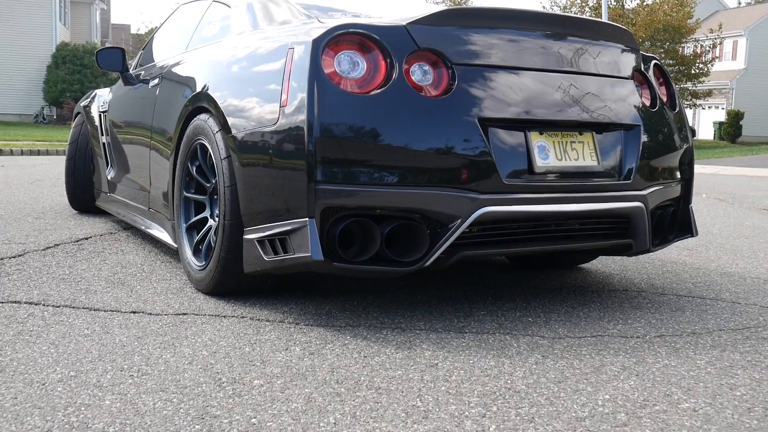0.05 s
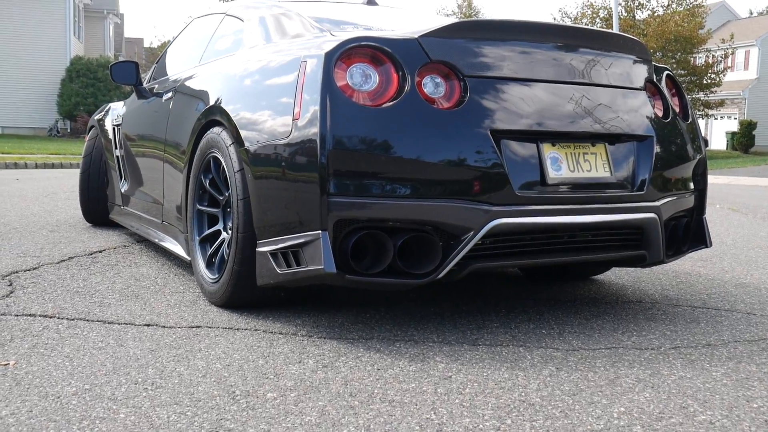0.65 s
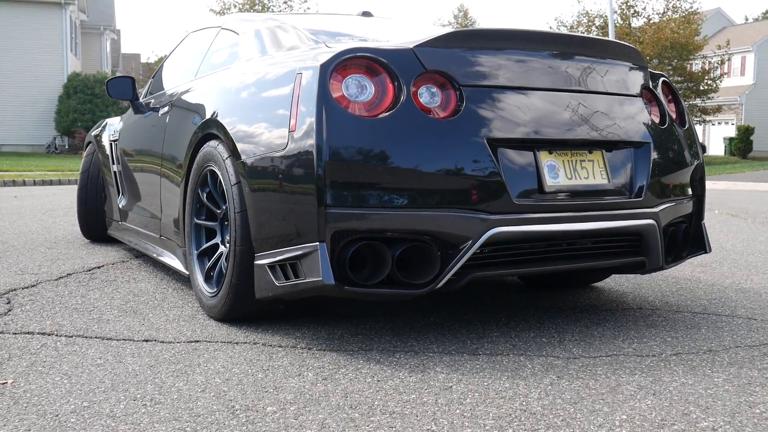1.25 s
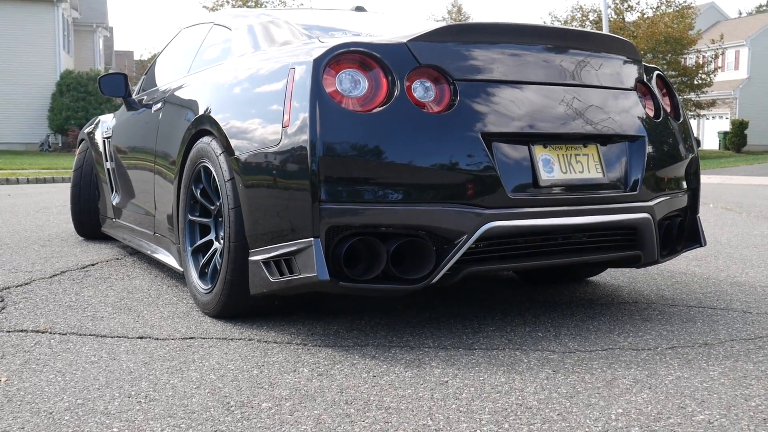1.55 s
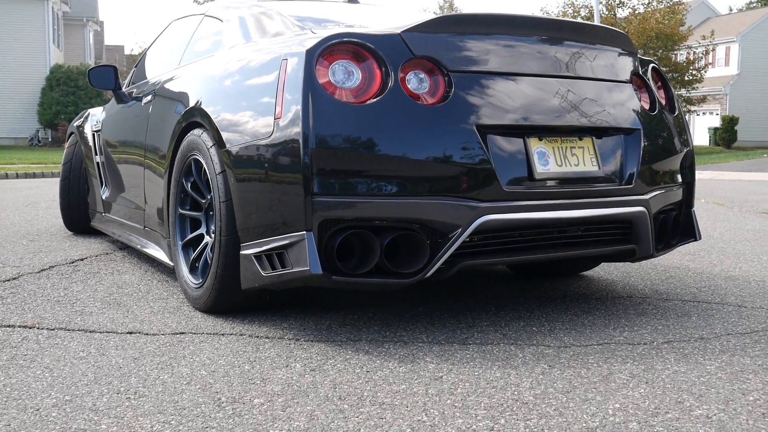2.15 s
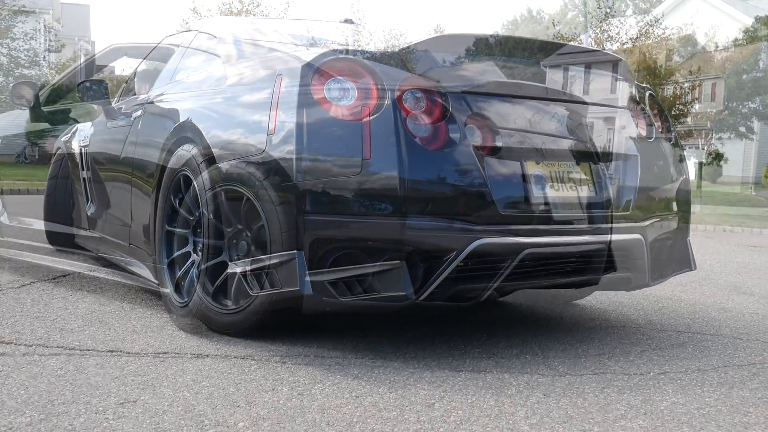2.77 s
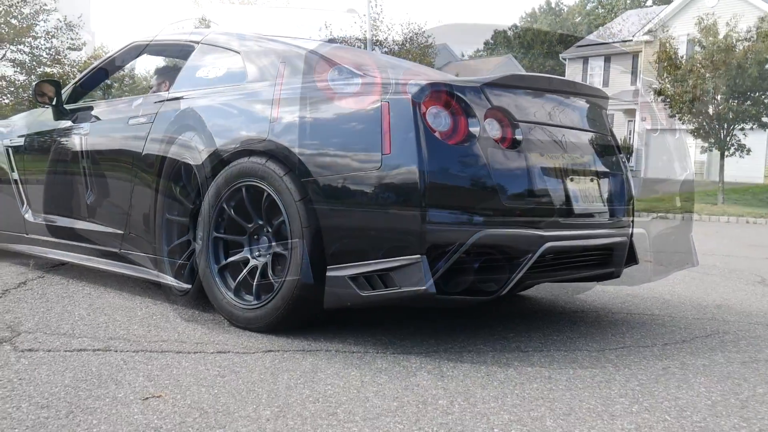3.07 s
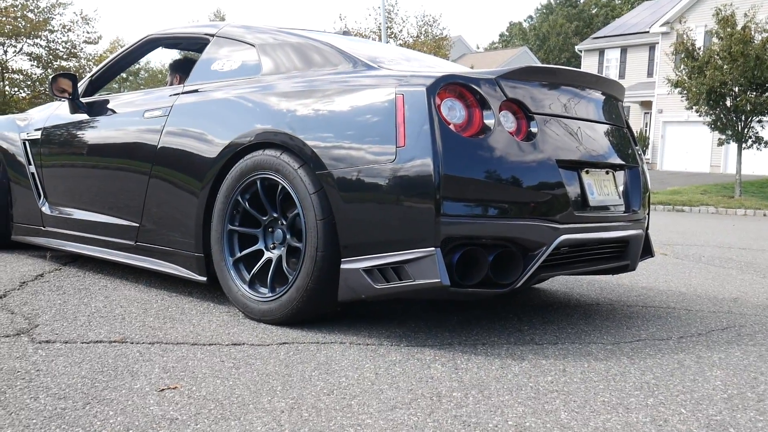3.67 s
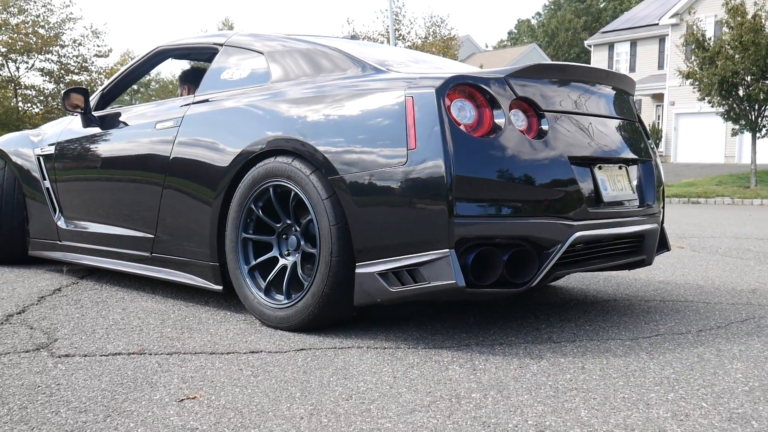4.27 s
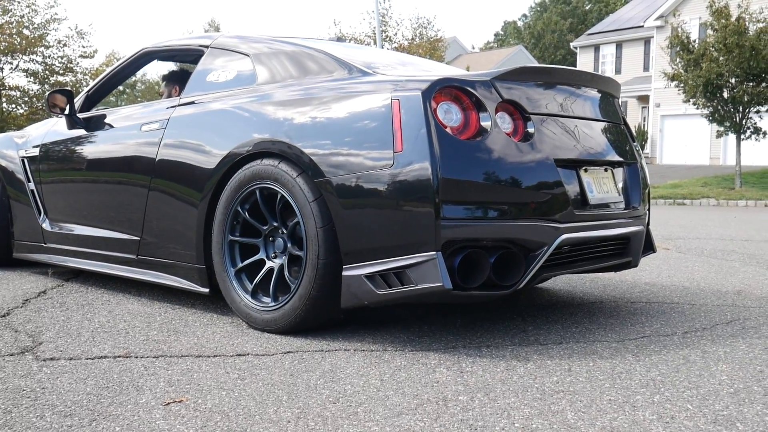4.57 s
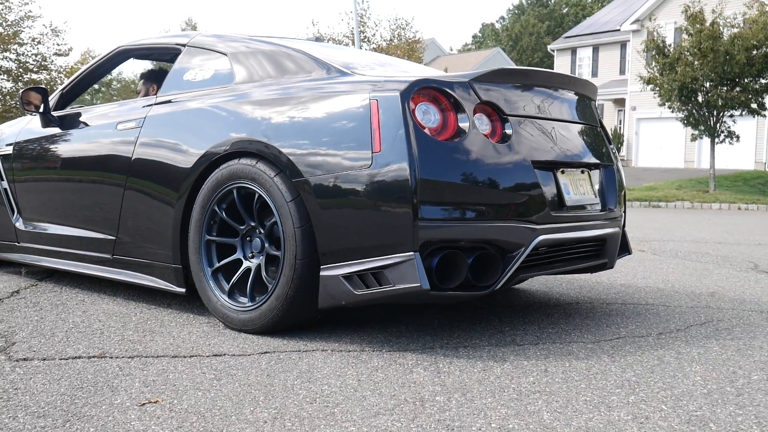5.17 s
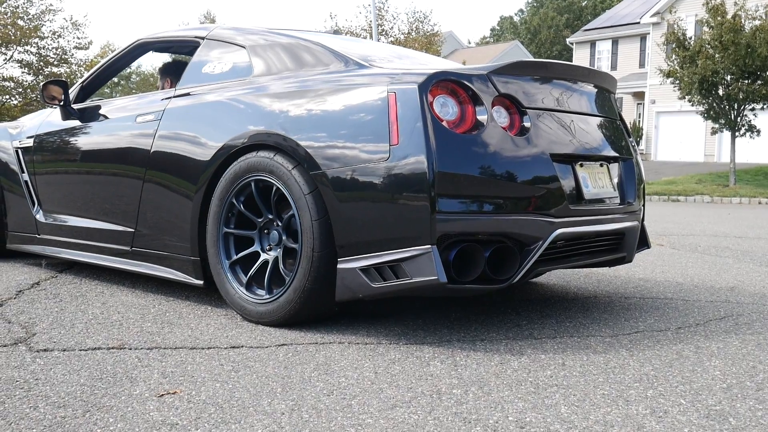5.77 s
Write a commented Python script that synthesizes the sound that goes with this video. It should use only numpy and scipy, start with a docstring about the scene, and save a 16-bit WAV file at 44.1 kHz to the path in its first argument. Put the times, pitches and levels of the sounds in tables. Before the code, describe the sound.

Deep, throbbing car idle close to the tailpipes, settling lower before one raised, held rev that slowly sags, with faint bird chirps.

```python
"""A tuned twin-turbo V6 parked in a quiet street, heard a few metres behind its tailpipes.
The fast cold idle dissolves into a lumpier warm idle; the engine stumbles, is blipped, held, then sags.
Six unequal firings ring the exhaust, gas spurts from the pipes and a belt-driven part whines with the revs.
Nearby are a few gritty scuffs and a small chipping bird; the houses return weak echoes."""
import sys
import numpy as np
from scipy import signal
from scipy.fft import rfft, irfft
from scipy.io import wavfile
from scipy.ndimage import uniform_filter1d

SR = 44100
rng = np.random.default_rng(int(sys.argv[2]) if len(sys.argv) > 2 else 0)


def to_wav(sig):
    """Store sig (one row per channel, or 1-D mono) as 16-bit WAV at the path in sys.argv[1].

    Samples outside -1..1 are clipped; the rate is SR.
    """
    pcm = np.clip(np.atleast_2d(sig), -1, 1) * 32767
    pcm = np.round(pcm).astype(np.int16)
    wavfile.write(sys.argv[1], SR, pcm.T)  # frames by channels


N = 256662
T = np.arange(N) / SR
CYLINDERS = 6
# start_s, end_s
SETTLE_S, DISSOLVE_S, CLIMB_S, SAG_S = (0.73, 2.15), (2.25, 3.35), (3.98, 4.51), (5.26, 5.48)
# start_s, attack_s, hold_s, release_s
THROTTLE_S, BLIP_S, RAGGED_S = (3.95, .08, .22, .25), (4.01, .02, .098, .09), (4.32, .049, .11, .13)


def undb(db):
    """Decibels to gain."""
    return 10 ** (np.asarray(db) / 20)


def curve(points, at=T):
    """Straight lines through (x, y) points."""
    return np.interp(at, *np.transpose(points))


def ramp(start_s, end_s):
    """Linear rise from 0 to 1."""
    return np.clip((T - start_s) / max(end_s - start_s, 1 / SR), 0, 1)


def episode(start_s, attack_s, hold_s, release_s):
    """Trapezoid envelope."""
    end_s = start_s + attack_s + hold_s
    return ramp(start_s, start_s + attack_s) - ramp(end_s, end_s + release_s)


def burst(start_s, rise_s, decay_s):
    """Linear rise, exponential decay."""
    age_s = np.maximum(T - start_s, 0)
    return np.minimum(age_s / rise_s, 1) * np.exp(-np.maximum(age_s - rise_s, 0) / decay_s)


def blend(a, b, start_s, end_s):
    """Equal-power crossfade from a to b."""
    turn = ramp(start_s, end_s) * np.pi / 2
    return a * np.cos(turn) + b * np.sin(turn)


def colour(x, response, size=16384):
    """Minimum-phase filter through (freq_hz, gain_db) points."""
    hz, db = np.transpose(response)
    grid_hz = np.maximum(np.arange(size // 2 + 1) * SR / size, 1)
    gain = undb(np.interp(np.log(grid_hz), np.log(hz), db))
    cepstrum = irfft(np.log(gain))
    cepstrum[1:size // 2] *= 2
    cepstrum[size // 2 + 1:] = 0
    return signal.fftconvolve(x, irfft(np.exp(rfft(cepstrum))))[:N]


def band(x, lo_hz, hi_hz):
    """Zero-phase band-pass."""
    return signal.sosfiltfilt(signal.butter(4, [lo_hz, hi_hz], "band", fs=SR, output="sos"), x)


def steady(x, size=4400):
    """Hold at unit RMS, keeping the detail within an engine cycle."""
    power = uniform_filter1d(uniform_filter1d(x * x, size), size)
    return x / np.sqrt(np.abs(power) + 1e-14)


def noise(response):
    """Coloured noise, unit RMS."""
    x = colour(rng.standard_normal(N), response)
    return x / x.std()


def walk(rate_hz):
    """Random wander, spread near 1."""
    knots = rng.standard_normal(1024)
    return np.interp(T * rate_hz, np.arange(len(knots)), knots)


def warm_state(idle, held, sagged):
    """A warm-engine quantity through idle, held revs and sag."""
    return idle + (held - idle) * ramp(*CLIMB_S) + (sagged - held) * ramp(*SAG_S)


def layer_db(levels, stumble_s=4.005, catch_s=0.034):
    """Level of an engine layer over time; it dips in a near-stall just before the blip."""
    cold_db, settled_db, idle_db, held_db, sag_db, blip_db, ragged_db, stumble_db, fade_s = levels
    stall = ramp(stumble_s - fade_s, stumble_s) - ramp(stumble_s, stumble_s + catch_s)
    cold_db = cold_db + (settled_db - cold_db) * ramp(*SETTLE_S)
    warm_db = warm_state(idle_db, held_db, sag_db)
    warm_db += blip_db * episode(*BLIP_S) + ragged_db * episode(*RAGGED_S) + stumble_db * stall
    warmth = ramp(*DISSOLVE_S)
    return 20 * np.log10(np.hypot((1 - warmth) * undb(cold_db), warmth * undb(warm_db)))


def firing_phase(rate):
    """Running count of firings."""
    return np.cumsum(curve(rate) * (T >= rate[0][0])) / SR


# puffs in firing order: strength_db, late_ms, half_width_ms
COLD_PUFFS = [(-2.8, -.33, .31), (2, -.74, .17), (-2.5, -.99, .19), (2.5, -.51, .28), (-1.1, -.5, .29),
              (1.8, -.4, .27)]
IDLE_PUFFS = [(.4, -.56, .36), (1.5, .24, .32), (.9, 0, .26), (-.7, .21, .31), (-.5, -.47, .33),
              (-1.6, .2, .33)]
HELD_PUFFS = [(4.5, -.33, .25), (-2.5, .4, .24), (3, .12, .22), (-7, .27, .28), (.5, .07, .3), (2, .1, .24)]
SAG_PUFFS = [(2.5, -.37, .21), (-.5, .5, .29), (.8, .3, .27), (-4.5, .43, .28), (-.2, .21, .25),
             (2, .15, .2)]
# cold imbalance: time_s, share
COLD_IMBALANCE = [(.45, .55), (.62, 1), (1.3, 1), (1.75, .7), (2, .3)]


def cylinder_balance():
    """Each cylinder's puff over time, cold and warm; they pull evenly as the throttle opens."""
    def uneven(puffs, share):
        return puffs.mean(0) + (puffs - puffs.mean(0)) * share

    cold = np.array(COLD_PUFFS)[..., None]
    warm = warm_state(*np.array([IDLE_PUFFS, HELD_PUFFS, SAG_PUFFS])[..., None])
    return uneven(cold, curve(COLD_IMBALANCE)), uneven(warm, 1 - episode(*THROTTLE_S))


# hard and failed firings: time_s, change_db
ODD_FIRINGS = [(2.337, 2), (4.123, 3), (4.134, 2.5), (4.164, -2), (4.183, 3), (4.193, 2.5), (4.212, -6),
               (4.23, 2), (4.257, -4), (4.302, -5), (4.311, -4), (4.336, 1.5)]


def firings(rate, cylinders, rough_db, steepen, jitter_ms_per_db, ripple_db, size=900):
    """One pressure puff per firing; harder ones are steeper, rough ones stray in time."""
    phase = firing_phase(rate)
    count = np.arange(1, int(phase[-1]) + 1)
    fire_s = np.interp(count, phase, T)
    chance = rng.standard_normal((len(count), 2))
    now = (fire_s * SR).astype(int)
    usual_db, late_ms, width_ms = cylinders[count % CYLINDERS, :, now].T
    change_db = rough_db[now] * chance[:, 0]
    for time_s, odd_db in ODD_FIRINGS:
        nearest = np.argmin(abs(fire_s - time_s))
        fire_s[nearest], change_db[nearest] = time_s, odd_db
    strength = undb(usual_db + change_db)
    fire_s += (late_ms + jitter_ms_per_db * rough_db[now] * chance[:, 1]) / 1000
    width_s = width_ms / 1000 / undb(change_db) ** steepen
    at = (fire_s * SR).astype(int)[:, None] + np.arange(-size, size)
    age_s = at / SR - fire_s[:, None]
    puffs = (strength * width_s)[:, None] / (width_s[:, None] ** 2 + age_s ** 2) * np.hanning(2 * size)
    inside = (at >= 0) & (at < N)
    train = np.bincount(at[inside], puffs[inside], N) * np.mean(width_s)
    # manifold waves repeat each engine cycle
    cycle = signal.resample(np.diff(rng.standard_normal(160)), 4096)
    ripple = np.interp(phase / CYLINDERS, np.arange(len(cycle)) / len(cycle), cycle, period=1)
    return train + undb(ripple_db) * ripple


# engine speed: time_s, firing_hz
COLD_SPEED = [(0, 74.07), (.15, 71.19), (.4, 70.31), (.65, 68.75), (1.15, 68.05), (1.5, 66.59),
              (2.3, 63.37), (2.85, 61.43)]
WARM_SPEED = [(2.458, 55.64), (3.2, 55.66), (3.55, 55.32), (3.85, 56.43), (3.93, 59.01), (4.03, 59.08),
              (4.1, 83.62), (4.18, 106.66), (4.3, 113.89), (4.42, 124.7), (4.65, 123), (4.95, 122.3),
              (5.25, 118.85), (5.5, 113.98), (5.82, 108.55)]


def combustion():
    """Cold and warm puff trains; firing turns ragged as the revs top out."""
    cold, warm = cylinder_balance()
    cold_rough_db = np.full(N, .45)
    warm_rough_db = warm_state(idle=1.1, held=.4, sagged=.4) + 1.8 * episode(*RAGGED_S)
    return (firings(COLD_SPEED, cold, cold_rough_db, steepen=.93, jitter_ms_per_db=.25, ripple_db=-25),
            firings(WARM_SPEED, warm, warm_rough_db, steepen=.66, jitter_ms_per_db=.14, ripple_db=-24))


# exhaust response per engine state: freq_hz, gain_db
PIPE_COLD = [(30, -49), (68, -6.5), (95, -15), (136, -1), (180, -21.5), (240, -9), (275, -7.5), (310, -8.5),
             (350, 0.5), (410, -10.5), (450, -16), (520, -28), (590, -20), (680, -33.5), (780, -27.5),
             (1000, -50), (1400, -45), (3000, -68)]
PIPE_SETTLED = [(30, -66.5), (62, -18), (90, -33.5), (128, -13.5), (185, -39.5), (258, -16.5), (295, -30.5),
                (328, -14.5), (358, -22.5), (392, -13.5), (440, -31), (540, -38), (790, -45), (1000, -53.5),
                (3000, -76.5)]
PIPE_IDLE = [(30, -57), (55, -4.5), (85, -2.5), (110, -3.5), (145, -11), (170, -10.5), (220, -2.5),
             (280, -0.5), (345, -2.5), (400, -8.5), (520, -23), (600, -18.5), (700, -20.5), (860, -23.5),
             (1020, -33.5), (1400, -46), (3000, -45)]
PIPE_HELD = [(30, -60), (60, -16.5), (90, -9), (122, -15.5), (165, -25.5), (245, -9.5), (280, -8),
             (310, -4.5), (370, -8), (430, -15), (500, -18.5), (580, -23), (640, -22), (760, -23.5),
             (880, -27.5), (940, -41), (1010, -28.5), (1200, -52), (3000, -69.5)]
PIPE_SAG = [(30, -64), (56, -12), (85, -21), (112, -16.5), (160, -22.5), (228, -12.5), (260, -14),
            (340, -0.5), (400, -11.5), (470, -16), (520, -22), (580, -15), (700, -15.5), (800, -26),
            (1000, -30), (1300, -46), (3000, -60)]


def exhaust(cold_puffs, warm_puffs):
    """The puffs and the turbulence they carry ring the pipes."""
    def ring(puffs, response, turbulence_db):
        eddies = noise([(60, -8), (250, -5), (600, -2), (1000, 0), (2500, -12)])
        turbulence = eddies * undb(turbulence_db) * (puffs + .2)
        return steady(colour(turbulence - puffs, response))

    cold = ring(cold_puffs, PIPE_COLD, turbulence_db=-18)
    settled = ring(cold_puffs, PIPE_SETTLED, turbulence_db=-22)
    idle = ring(warm_puffs, PIPE_IDLE, turbulence_db=-14)
    held = ring(warm_puffs, PIPE_HELD, turbulence_db=-24)
    sagged = ring(warm_puffs, PIPE_SAG, turbulence_db=-24)
    cold_note = blend(cold, settled, 1.05, 1.75)
    warm_note = blend(idle, blend(held, sagged, *SAG_S), 4.14, 4.29)
    return blend(cold_note, warm_note, 2.585, 3.34)


# tailpipe levels: cold_db, settled_db, idle_db, held_db, sag_db,
# blip_change_db, ragged_change_db, stumble_change_db, stumble_fade_s
BOOM_LEVELS = (-15, -14, -15.5, -15.5, -14.5, 3.5, 1.5, -11, 0.09)
BARK_LEVELS = (-32, -36.5, -32.5, -29.5, -30, 0.5, 3.5, -14, 0.04)


def boom_and_bark(note, kick_db_per_db=2.34, kick_s=0.013):
    """Low boom and mid bark of the tailpipes; the bark follows odd firings and idle putts."""
    boom = band(note, 32, 500)
    bark = band(note - boom, 200, 2500)
    kicks_db = sum(db * np.exp(-((T - time_s) / kick_s) ** 2) for time_s, db in ODD_FIRINGS)
    bark_db = layer_db(BARK_LEVELS) + kick_db_per_db * kicks_db
    bark_db += putts_db(COLD_SPEED, cylinder=1, start_s=.5, end_s=1.35, release_s=1, decay_s=.012)
    bark_db += putts_db(WARM_SPEED, cylinder=2, start_s=2.85, end_s=3.8, release_s=.15, decay_s=.028)
    return steady(boom) * undb(layer_db(BOOM_LEVELS)) + steady(bark) * undb(bark_db)


def throb(note, rate, peak_firing, depth):
    """The main pipe resonance swells at one place in the firing order and ebbs half a cycle later."""
    swing = np.cos(2 * np.pi * (firing_phase(rate) - peak_firing) / CYLINDERS)
    return band(note, 310, 430) * depth * swing


# gas spectra: freq_hz, gain_db
RUSH_IDLE = [(700, 5), (1100, 2.5), (1400, 0.5), (2000, -4), (2900, -7), (3600, -8.5), (4200, -7),
             (5000, -14), (5700, -13.5), (7000, -20.5), (10000, -26.5)]
RUSH_REVVED = [(700, 10.5), (1200, 3), (1700, 0), (2300, -3), (3200, -5), (4300, -9.5), (5300, -15.5),
               (7000, -17.5), (8400, -12), (10500, -28), (15000, -30.5)]
HISS_SPECTRUM = [(3000, -23.5), (5200, -3), (6500, 2.5), (7400, 7.5), (8300, 9), (9300, 2.5), (10600, -8.5),
                 (11500, -2), (12400, 5), (14000, 3), (15500, -3.5)]
# gas levels before trim: columns as BOOM_LEVELS
RUSH_LEVELS = (-48, -51, -45, -41.5, -44.5, 6, 0.5, -3, 0.3)
HISS_LEVELS = (-57.5, -60, -54, -66.5, -69.5, 7, 3, -13, 0.34)
# spits around the stumble, before trim: start_s, peak_db
HISS_SPITS = [(3.81, -48), (3.924, -49.5), (4.025, -49)]


def gas(puffs, spurt_s=0.0018, ceiling=2.2, rush_trim_db=4.0, hiss_trim_db=5.5):
    """Gas spurts after each firing, the hardest ones softly limited; the hiss fades at raised revs."""
    spurts = steady(signal.lfilter([1], [1, -np.exp(-1 / (spurt_s * SR))], puffs))
    spurts = ceiling * np.tanh(spurts / ceiling)
    rush = blend(noise(RUSH_IDLE), noise(RUSH_REVVED), 3.9, 4.44)
    rush *= (1 + .17 * spurts) * undb(1.4 * walk(140))
    hiss = noise(HISS_SPECTRUM) * (1 + .19 * spurts) * undb(2.15 * walk(83))
    spits = sum(undb(db) * burst(start_s, rise_s=.013, decay_s=.014) for start_s, db in HISS_SPITS)
    rush_gain = undb(layer_db(RUSH_LEVELS) + rush_trim_db)
    hiss_gain = np.hypot(undb(layer_db(HISS_LEVELS)), spits) * undb(hiss_trim_db)
    return steady(rush) * rush_gain + steady(hiss) * hiss_gain


def unsteady_tone(pitch_hz, waver=0.003, flicker_db=3):
    """Sine with wavering pitch and flickering level."""
    cycles = np.cumsum(pitch_hz * (1 + waver * walk(150))) / SR
    return np.sin(2 * np.pi * cycles) * undb(flicker_db * walk(30))


def warm_up(cold, warm):
    """Crossfade from cold to warm engine, dipping midway."""
    warmth = ramp(*DISSOLVE_S)
    return (1 - warmth) * cold + warmth ** 2 * warm


def high_whistles(whistle_hz=3625, mode_hz=4100):
    """A thin whistle sounds briefly at the start; a breathy upper mode lasts until the revs climb."""
    breath = steady(band(rng.standard_normal(N), mode_hz - 150, mode_hz + 150))
    whistle = unsteady_tone(whistle_hz) * undb(-52) * (1 - ramp(.29, .34))
    return whistle + breath * warm_up(undb(-69.5), undb(-68) * (1 - ramp(*CLIMB_S)))


# resonance carrying the whine: freq_hz, gain_db
WHINE_RESONANCE = [(2200, -25), (2780, 0), (3100, -2), (3250, -5), (3380, 2), (3480, -5), (3800, -20),
                   (4220, -4), (4700, -25)]


def belt_whine(order=25.3, swell_db=2):
    """A belt-driven part sounds three harmonics of a multiple of the firing rate."""
    def harmonics(rate):
        pitch_hz = order * curve(rate)
        tones = sum(unsteady_tone(k * pitch_hz) * undb(curve(WHINE_RESONANCE, k * pitch_hz))
                    for k in (1, 2, 3))
        return tones * undb(swell_db * walk(7))

    cold = harmonics(COLD_SPEED) * undb(np.interp(T, SETTLE_S, (-59, -65)))
    warm = harmonics(WARM_SPEED) * undb(warm_state(idle=-55.5, held=-57, sagged=-58))
    return warm_up(cold, warm * (1 - episode(*THROTTLE_S)))


# scrapes: start_s, peak_db, decay_s
SCUFF_EVENTS = [(.399, -43, 0.016), (0.424, -42.5, 0.018), (2.237, -40.5, 0.0038), (2.247, -44, 0.0071),
                (2.258, -45.5, 0.015), (2.267, -43, 0.022)]
# grit spectrum: freq_hz, gain_db
SCUFF_SPECTRUM = [(600, -19), (1200, 10.5), (3000, 5.5), (6000, 3), (9000, -5), (15000, -25)]


def scuffs(rise_s=0.0022):
    """Brief gritty scrapes close by."""
    envelope = sum(undb(db) * burst(start_s, rise_s, decay_s) for start_s, db, decay_s in SCUFF_EVENTS)
    return noise(SCUFF_SPECTRUM) * envelope


def putts_db(rate, cylinder, start_s, end_s, release_s, decay_s, depth_db=4, lead_s=.001, attack_s=.15):
    """At idle one cylinder putts once a cycle: the bark jumps, then dies away."""
    firing_hz = curve(rate)
    phase = firing_phase(rate) + lead_s * firing_hz
    age_s = (phase - cylinder) % CYLINDERS / firing_hz
    swing = uniform_filter1d(np.exp(-age_s / decay_s), 64)
    gate = ramp(start_s, start_s + attack_s) - ramp(end_s, end_s + release_s)
    return depth_db * (swing - swing.mean()) * gate


# single chips: start_s, peak_db
BIRD_CHIPS = [(.653, -43.5), (1.345, -41), (1.567, -44.5), (1.74, -54), (2.498, -41), (3.192, -43.5),
              (3.421, -41.5), (4.345, -39.5), (5.036, -38), (5.267, -40.5)]


def bird_chips(chip_hz=5900, trill_hz=6650, trill_s=5.319, gap_s=.0578, size=4096):
    """Sharp chips smeared by the house fronts; the last runs into a higher, swelling trill."""
    out = np.zeros(N + size)
    freq_hz = np.arange(size // 2 + 1) * SR / size
    envelope = burst(0, rise_s=.0044, decay_s=.008)[:size]
    # offset_hz, gain_db
    spectrum = [(-2000, -38), (-900, -9), (-500, -.5), (399, -2.5), (1299, -12), (3197, -16.5),
                (5802, -22), (8009.5, -31)]
    chips = [(start_s, peak_db, chip_hz) for start_s, peak_db in BIRD_CHIPS]
    trill = [(trill_s + k * gap_s, -50.5 + .5 * k, trill_hz) for k in range(7)]
    for start_s, peak_db, pitch_hz in chips + trill:
        gain = undb(curve(spectrum, freq_hz - pitch_hz))
        chip = irfft(rfft(rng.standard_normal(size)) * gain)
        at = int(start_s * SR)
        out[at:at + size] += chip / chip.std() * envelope * undb(peak_db)
    return out[:N]


# buzz calls: start_s, length_s, level_db
BIRD_BUZZES = [(2.01, 0.179, -57), (5.71, .14, -52)]
# buzz spectrum: freq_hz, gain_db
BUZZ_SPECTRUM = [(5500, -19), (6400, -4), (6750, -3.5), (7100, -1), (7600, -12), (8200, -6), (9500, -27)]


def bird_buzzes(edge_s=.008):
    """Two thin, high, noisy calls."""
    gate = sum(undb(level_db) * episode(start_s, edge_s, length_s - 2 * edge_s, edge_s)
               for start_s, length_s, level_db in BIRD_BUZZES)
    return gate * noise(BUZZ_SPECTRUM)


def burble(peak_firing=1.7, mode_hz=343, width_s=0.2, peak_db=-23):
    """The lump of the warm idle: a pipe mode restarts and swells slightly once per engine cycle."""
    half = CYLINDERS / 2
    from_peak = (firing_phase(WARM_SPEED) - peak_firing + half) % CYLINDERS - half
    age_s = from_peak / curve(WARM_SPEED)
    mode = np.sin(2 * np.pi * mode_hz * age_s) * np.exp(-(age_s / width_s) ** 2)
    return mode * undb(peak_db) * episode(2.9, .34, .71, .06)


# sideways return from the street: freq_hz, gain_db
STREET_RETURN = [(100, -56.5), (330, -67), (480, -27), (1000, -16), (2000, -26.5), (5000, -30.5),
                 (9000, -28.5), (15000, -29)]


def street(x, t60_s=0.28, size=12000):
    """Weak scattered echoes from the houses, opposite in the two ears."""
    echoes = rng.standard_normal(size) * np.exp(-np.log(1000) * T[:size] / t60_s)
    side = colour(signal.fftconvolve(x, echoes / np.linalg.norm(echoes))[:N], STREET_RETURN)
    return np.array([x + side, x - side])


def scene():
    """Car, bird and scuffs in the street."""
    cold_puffs, warm_puffs = combustion()
    note = boom_and_bark(exhaust(cold_puffs, warm_puffs))
    cold_throb = throb(note, COLD_SPEED, peak_firing=4.5, depth=.55) * episode(-.1, .1, .45, .25)
    rev_throb = throb(note, WARM_SPEED, peak_firing=5.9, depth=.4) * episode(4.55, .3, .5, .35)
    puffs = blend(cold_puffs, warm_puffs, *DISSOLVE_S)
    car = note + cold_throb + rev_throb + gas(puffs) + high_whistles() + belt_whine() + burble()
    return street(car + bird_chips() + bird_buzzes() + scuffs())


def record(dry):
    """Steep low-pass on the highest treble."""
    top_hz = 15650
    return signal.sosfilt(signal.ellip(10, .2, 80, top_hz, fs=SR, output="sos"), dry)


dry = scene()
out = record(dry)
to_wav(out)
```